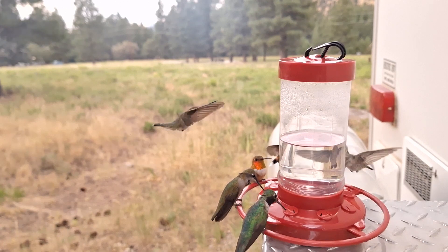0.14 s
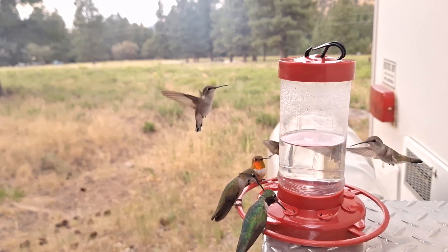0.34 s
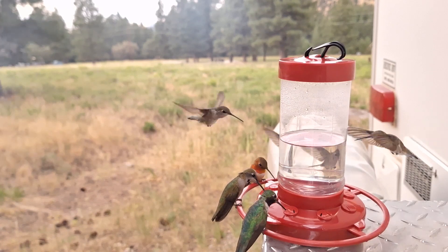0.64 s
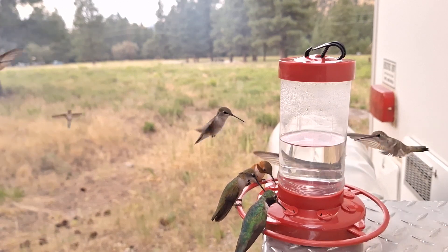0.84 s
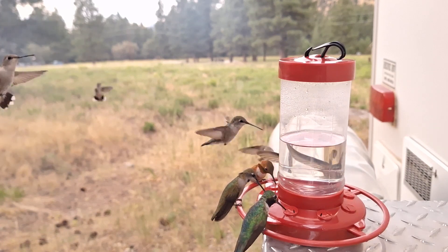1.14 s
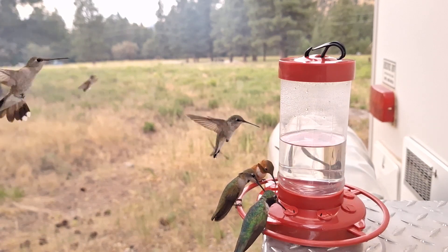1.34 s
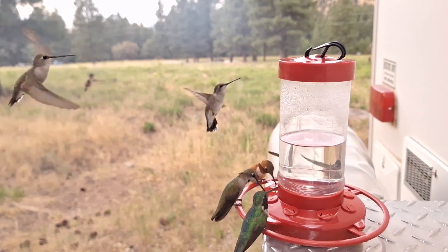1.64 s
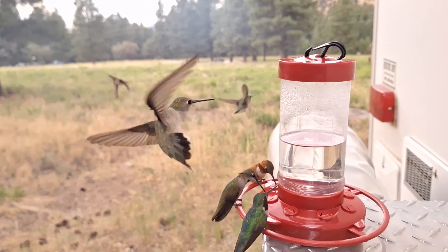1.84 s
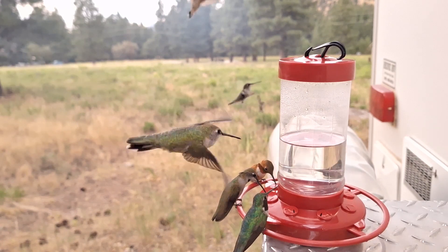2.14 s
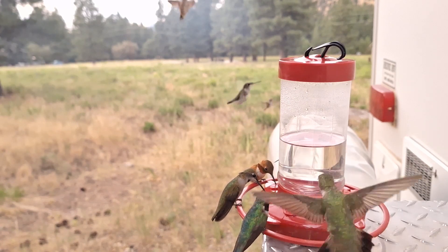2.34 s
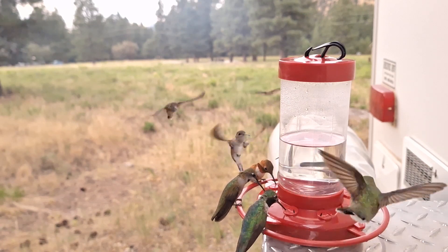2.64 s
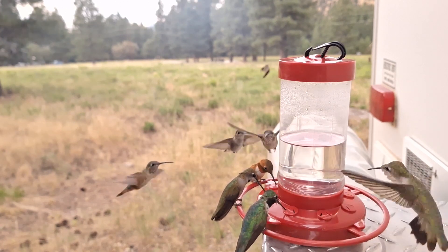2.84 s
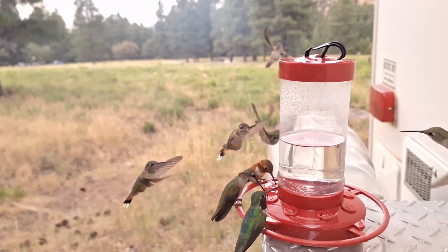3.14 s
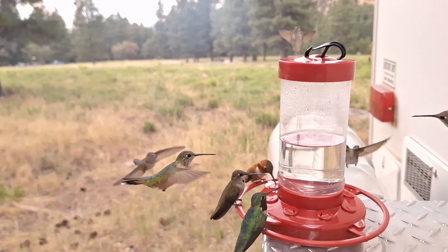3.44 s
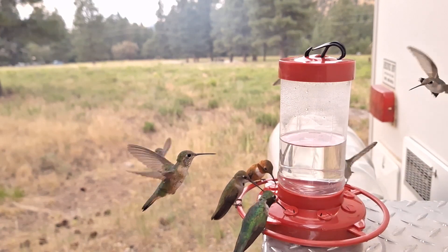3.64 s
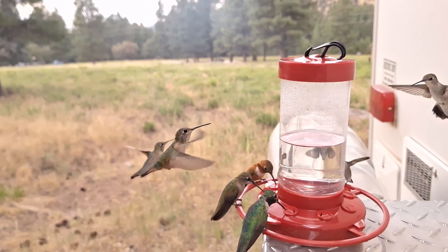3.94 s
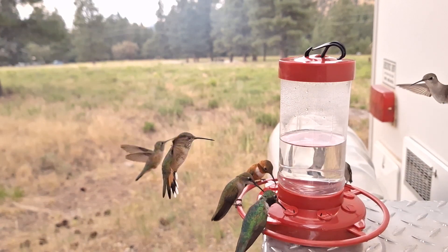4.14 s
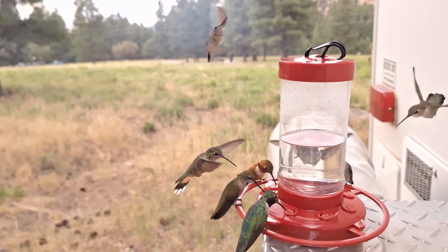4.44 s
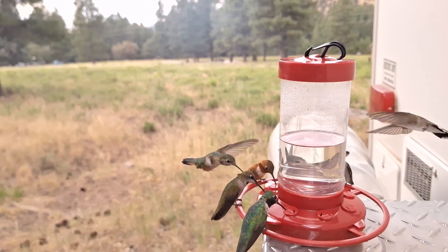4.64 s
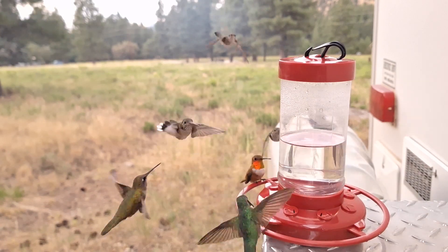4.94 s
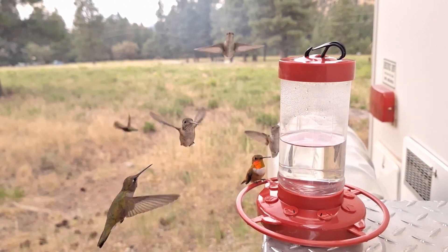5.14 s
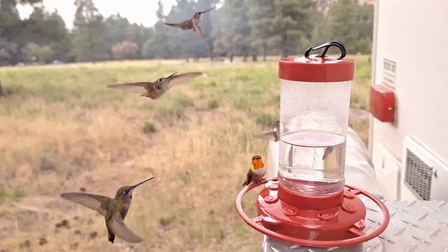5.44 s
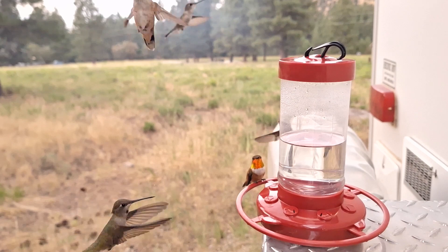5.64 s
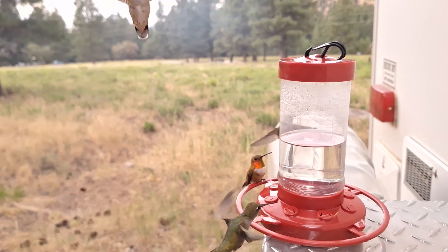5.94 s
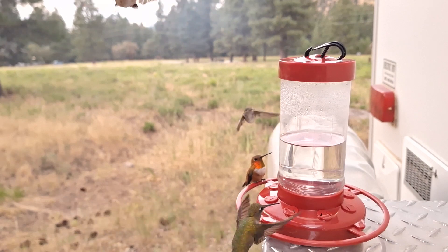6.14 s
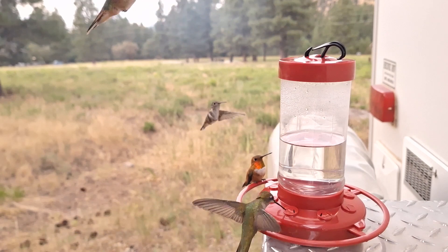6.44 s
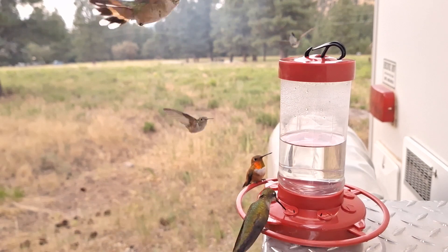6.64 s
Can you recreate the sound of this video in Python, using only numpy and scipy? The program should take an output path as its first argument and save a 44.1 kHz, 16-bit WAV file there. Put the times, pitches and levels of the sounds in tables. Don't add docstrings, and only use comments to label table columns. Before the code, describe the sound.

Deep fluttering wing hums swell and fade around a feeder amid tiny chips and buzzy notes, then wings clap and a shrill feather whistle bursts past.

```python
import sys
import numpy as np
from scipy import signal
from scipy.fft import rfft, irfft
from scipy.io import wavfile
from scipy.ndimage import uniform_filter1d

SR = 44100
rng = np.random.default_rng(int(sys.argv[2]) if len(sys.argv) > 2 else 0)


def generate_wav(sig):
    pcm = np.round(np.clip(np.atleast_2d(sig).T, -1, 1) * 32767).astype(np.int16)
    wavfile.write(sys.argv[1], SR, pcm)


def how_loud(loudness_db):
    steps = np.asarray(loudness_db, float) / 20
    return 10 ** steps


N = 298998
USUAL_DB = -50


def evened(x):
    return x / np.sqrt(np.mean(x ** 2) + 1e-20)


def read(points, hz):
    f, value = np.transpose(points)
    return np.interp(np.log(hz + 1), np.log(f + 1), value)


def curves(rows):
    s, *columns = np.transpose(rows)
    return [np.interp(np.arange(N) / SR, s, c) for c in columns]


def drift(hz):
    steps = rng.standard_normal(N // 64 + 2)
    slow = signal.sosfiltfilt(signal.butter(2, hz, fs=SR / 64, output="sos"), steps)
    return evened(np.interp(np.arange(N) / 64, np.arange(len(slow)), slow))


def band(x, lo_hz, hi_hz):
    return signal.sosfilt(signal.butter(2, [lo_hz, min(hi_hz, SR / 2.1)], "band", fs=SR, output="sos"), x)


def sided(x, pan_db):
    return np.array([x * how_loud(pan_db / 2), x * how_loud(-pan_db / 2)])


def add(mix, s, sound):
    part = mix[:, round(s * SR):][:, :sound.shape[1]]
    part += sound[:, :part.shape[1]]


def visits(rows):
    edge_db, away_db = 4.5, 39
    s, stay, hz, db = np.transpose(rows)[:, :, None]
    t = np.arange(0, N + 256, 256) / SR
    gone_db = edge_db * (2 * (t - s) / stay) ** 2
    power = how_loud(2 * (db - np.minimum(gone_db, away_db)))
    pull = how_loud(db - np.minimum(gone_db, 200)) + 1e-30
    rate = (pull * hz).sum(0) / pull.sum(0)
    return curves(np.transpose([t, rate, 10 * np.log10(power.sum(0))]))


def wings(hz, db, orders, wobble, waver_db, pan_db):
    beats = np.cumsum(hz * (1 + wobble * drift(11.9))) / SR
    hum = 0
    for k in range(1, 11):
        tone = np.sqrt(2) * np.cos(2 * np.pi * (k * beats + rng.random()))
        hum = hum + tone * how_loud(db + read(orders, k) + waver_db * min(k - 1, 3) * drift(8.7))
    return sided(hum, pan_db + 1.3 * drift(9.1)), beats


def near_birds():
    # middle in seconds, stay in seconds, strokes (twice the beat) in Hz, hum in dB.
    slow_visits = [(.45, 0.59, 83.2, -45), (1.05, 0.12, 89.65, -49), (1.38, 0.19, 78.53, -44.5),
                   (1.82, 0.29, 90.23, -37), (2.35, 0.5, 87.82, -38.5), (3.16, 0.32, 86, -44),
                   (3.61, 0.13, 93.57, -34.5), (4.06, 0.14, 78.7, -43.5), (4.36, 0.19, 80.77, -39),
                   (4.85, 0.29, 83.94, -34), (5.27, 0.1449, 91.32, -37.5), (5.57, 0.23, 81.5, -43.5),
                   (5.95, 0.38, 72.1, -44.5), (6.32, .2, 85.1, -37), (6.55, .3, 74.4, -43.5)]
    # middle in seconds, stay in seconds, strokes (twice the beat) in Hz, hum in dB.
    fast_visits = [(.25, 0.45, 101.8, -43.5), (.75, 0.21, 91.73, -38.5), (1.17, 0.15, 100.1, -38.5),
                   (1.94, 0.15, 106.3, -43), (2.26, 0.13, 106.9, -45), (2.71, 0.21, 94.76, -39),
                   (3.16, .2, 102.7, -38), (3.33, 0.14, 86.55, -42), (3.55, .3, 101.2, -38.5),
                   (3.8, 0.19, 86.5, -44), (4.06, 0.16, 90.1, -41.5), (4.51, 0.15, 94.9, -37),
                   (4.82, 0.1501, 102.7, -41.5), (5.12, 0.12, 88.4, -40.5), (5.5, 0.39, 88.16, -38.5),
                   (5.87, 0.29, 87.53, -39), (6.17, 0.24, 86.37, -41.5), (6.47, 0.22, 92.5, -40)]
    # middle in seconds, stay in seconds, beat in Hz, hum in dB.
    side_visits = [(.45, 0.61, 64.06, -52), (1.1, 0.84, 52.6, -53.5), (1.85, .4, 48.05, -43.5),
                   (2.26, .2, 46.48, -37.5), (2.71, 0.2, 46.42, -36), (3.12, 0.33, 58.73, -42.5),
                   (3.6, 0.49, 60.92, -51.5), (4.7, 0.68, 60.2, -47.5), (5.4, .5, 54.07, -48.5),
                   (5.85, 0.31, 54.09, -44.5), (6.25, 0.32, 45.48, -40), (6.7, 0.43, 49, -49.5)]
    # order of the beat, level in dB.
    facing = [(1, -26.5), (2, -2.5), (3, -21), (4, -20.5), (5, -22.5), (6, -29.5), (8, -33.5), (12, -42.5)]
    # order of the beat, level in dB.
    sideways = [(1, -5), (2, -6), (3, -11), (4, -16.5), (6, -27), (12, -38.5)]
    (slow_hz, slow_db), (fast_hz, fast_db) = visits(slow_visits), visits(fast_visits)
    slow, slow_beats = wings(slow_hz / 2, slow_db, facing, wobble=0.01005, waver_db=1.3, pan_db=1.5)
    fast, fast_beats = wings(fast_hz / 2, fast_db, facing, wobble=0.01004, waver_db=-0.23, pan_db=2.5)
    side, _ = wings(*visits(side_visits), sideways, wobble=0.01496, waver_db=0.0, pan_db=6.0)
    near_db = np.maximum(slow_db, fast_db) - USUAL_DB - 8.0
    return slow + fast + side, (slow_beats, fast_beats), near_db


def trill():
    # time in seconds, level in dB.
    flight = [
        (5.17, -41),
        (5.22, -32),
        (5.46, -39),
        (5.64, -46.5),
        (5.74, -51),
        (5.86, -50.5),
        (6.12, -56),
        (6.27, -45.5),
        (6.66, -57.5),
    ]
    # time in seconds, peak in dB, left minus right in dB.
    downstrokes = [(5.1606, -55, 1.5), (5.1834, -32.5, -1), (5.2038, -23.5, 7), (5.2252, -27, 2),
                   (5.2492, -23.5, 8), (5.2728, -29.5, 2), (5.2967, -27, 11.5), (5.3204, -31, 9),
                   (5.343, -30, 7), (5.3689, -29, 9.5), (5.3898, -28, 13), (5.4138, -31, 8),
                   (5.4362, -31.5, 11.0), (5.4612, -32.5, 11.5), (5.4844, -36, 9.5), (5.5067, -40, 9.0),
                   (5.535, -33, 14), (5.5556, -34.5, 9), (5.577, -38, 12), (5.604, -45, 10),
                   (5.6258, -42, 10), (5.6453, -43, 3), (5.671, -43, 12), (5.6937, -35.5, 11),
                   (5.7169, -43, 6), (5.739, -42, 7), (5.764, -37, 12.0), (5.7845, -44, 4),
                   (5.8126, -49, 15), (5.8336, -45, 6), (5.8541, -42, 3.0), (5.876, -46.5, 7.5),
                   (5.8997, -45, 6.0), (5.9218, -48, 6), (5.9476, -48, 6.5), (5.967, -49, 8),
                   (5.99, -52, 8), (6.0375, -57, 11), (6.0564, -56.5, 5), (6.0793, -60, 11),
                   (6.1111, -59, 8), (6.1341, -55, 2.0), (6.1501, -57.5, 5.5), (6.1784, -53, 8),
                   (6.2017, -48, 8), (6.2215, -47, 6), (6.2439, -48, 3.0), (6.27, -46, 7),
                   (6.2935, -46, 6.5), (6.3162, -51, 2.0), (6.3387, -50, 3.0), (6.3696, -45, 5),
                   (6.3889, -49, 4), (6.409, -54, 1.5), (6.4404, -58, 2.5), (6.4664, -55, 2.0),
                   (6.489, -50, 2), (6.5384, -60, 8), (6.5641, -51, 0), (6.5868, -62, 5)]
    hz, last_beat_hz, end_s = 5765, 42.5, 6.697
    drop_db_per_side_db = 0.24
    t = np.arange(N) / SR
    db = curves(flight)[0]
    far_db = db.max() - db
    s, peak_db, side_db = np.transpose(downstrokes)
    count = np.append(0, np.cumsum(np.round(np.diff(s) * last_beat_hz)))
    beat_times = [s[0] - 1, *s, s[-1] + 1]
    beats = np.interp(t, beat_times, [-last_beat_hz, *count, count[-1] + last_beat_hz])
    edge = np.clip(np.minimum(t - s[0] + .012, end_s - t) / 0.004, 0, 1)
    place = (beats + .31) % 1 - .36
    hold = np.clip(.39 - far_db / 300, .3, 1)
    pulse = np.exp(-abs(place / np.where(place < 0, .07, hold)) ** 3)
    stroke_db = peak_db - drop_db_per_side_db * (side_db - 10) - 4
    stroke = how_loud(np.interp(np.floor(beats + .31), count, stroke_db)) * pulse
    stroke += how_loud(db - 15.5 + 0.4 * far_db)
    stroke *= how_loud(-6.0 * (t < s[2] - .002))
    pitch = hz + 400 * np.interp(place, [-.36, -.04, .2, .3, .45, .64], [.4, -.05, .1, .9, 1, .4])
    pitch += (50 + 2.5 * far_db) * np.tanh(drift(220)) + 25 * drift(15)
    turns = 2 * np.pi * np.cumsum(pitch) / SR
    shared_db = 1.26 * drift(260) - 5 * np.exp(-((place - .2) / .04) ** 2) - 2.1 * (place > .2)
    paths = [turns, turns + 1.784 + 0.58 * drift(39.95)]
    tone = np.array([(np.sin(p) + how_loud(-27.0) * np.sin(2 * p)) * how_loud(shared_db + 0.6 * drift(180)) for p in paths])
    rush = rng.standard_normal((2, N))
    tone += how_loud(-33) * evened(band(rush, hz, 1.31 * hz))
    blur = np.clip((far_db - 4) / 40, .08, .4)
    lo_hz, hi_hz = .96 * hz, 1.075 * hz
    tone += blur * evened(band(band(rush, lo_hz, hi_hz), lo_hz, hi_hz))
    return sided(stroke * edge, np.interp(t, s, side_db) - 3) * tone


def chip(db, second_db, length_ms, top_hz, drop_ms, knee_hz, slide, fade_db, pan_db):
    # frequency in Hz, gain in dB.
    beak = [(2600, -3.5), (3300, -6.5), (4200, 2), (6000, 1), (8000, 4), (10000, -2.5), (12500, -10),
            (16000, -13)]
    length_ms = 0.81 * length_ms
    ms = np.arange(0, length_ms, 1000 / SR)
    hz = knee_hz - slide * ms + (top_hz - knee_hz) * np.exp(-ms / drop_ms)
    turns = np.cumsum(hz) / SR
    catch_db = 2.3 * rng.standard_normal((4, 16))
    out = 0
    for k, order_db in ((1, 3.66), (2, second_db + 7.0), (3, second_db + .1), (4, second_db - 0.5)):
        db_k = order_db + read(beak, k * hz) + np.interp(ms, np.arange(16) * 2.51, catch_db[k - 1])
        out = out + how_loud(db_k) * np.sin(2 * np.pi * k * turns) * (k * hz < SR / 2)
    out = out + how_loud(-9) * evened(band(rng.standard_normal(2000), 4000, 14700))[:len(ms)]
    envelope = np.clip(ms / .9, 0, 1) * np.clip((length_ms - ms) / 7.0, 0, 1)
    return sided(how_loud(db + 5.0 - fade_db * ms / 24) * out * envelope, pan_db)


def chur(db, start_hz, bright_db, pan_db, second_db, third_db, length_ms, bend):
    # harmonic number, level in dB.
    chur_orders = [(1, -0.5), (2, -4.5), (3, 1.5), (4, -2), (5, -7.5), (6, -11), (8, -26)]
    u = np.linspace(0, 1, round(length_ms * SR / 1000))
    warble = np.interp(u, np.linspace(0, 1, 8), .012 * rng.standard_normal(8))
    turns = np.cumsum(start_hz * (1 - bend * u ** 1.675 + warble)) / SR
    rasp = how_loud(2.6 * rng.standard_normal((8, 12)))
    out = 0
    for k in range(1, 9):
        db_k = read(chur_orders, k) + bright_db * (k > 1) + second_db * (k == 2) + third_db * (k == 3)
        rough = np.interp(u, np.linspace(0, 1, 12), rasp[k - 1])
        out = out + how_loud(db_k) * rough * np.sin(2 * np.pi * k * turns)
    out = out + how_loud(bright_db - 5) * evened(band(rng.standard_normal(2000), 4700, 15000))[:len(u)]
    return sided(how_loud(db + 4.0 - 8.1 * u) * out * signal.windows.tukey(len(u), .4), pan_db)


def clap(db, low_db, pan_db):
    t = np.arange(500) / SR
    burst = rng.standard_normal((2, 500))
    crack = how_loud(db + 3.0) * evened(band(burst[0], 5800, 16000)) * np.exp(-t / 0.00081)
    thud = how_loud(low_db + 8.0) * evened(band(burst[1], 310, 1870)) * np.exp(-t / 0.0012)
    return sided(crack, pan_db + 9.5) + thud


def scuffle():
    size = round(.2 * SR)
    brush = evened(band(rng.standard_normal((2, N)), 553, 2894)) * how_loud(4.6 * drift(159))
    return how_loud(-62.5) * brush[:, :size] * np.hanning(size)


def peeps(length, beat_hz, hz, sag, db):
    t = np.arange(-.01, length + .01, 1 / SR)
    beat = np.round(t * beat_hz)
    loud, high, early = rng.standard_normal((40, 3))[beat.astype(int)].T
    arch_db = np.interp(t / length, [0, .2, 1], [-2, 0, -2])
    ms = 1000 * (t - beat / beat_hz)
    turns = np.cumsum(hz - sag * t - 30 * ms + 60 * high) / SR + early
    tone = np.sin(2 * np.pi * turns + np.array([[0], [1.2]]))
    peep = how_loud(4 * loud) * np.exp(-(ms / 2.2) ** 2) * tone * (beat >= 0) * (beat <= length * beat_hz)
    haze = evened(band(rng.standard_normal((2, len(t))), .9 * hz, 1.06 * hz)) * signal.windows.tukey(len(t), .3)
    return how_loud(db + arch_db) * (peep + how_loud(-14) * haze)


def air(spectrum, size, patchy_db):
    # frequency in Hz, correlation from -1 to 1.
    likeness = [(60, 0.78), (180, 0.91), (550, 0.51), (1650, -0.069), (4970, -0.06), (15000, 0.037)]
    frames, hz = 4 * N // size + 5, np.fft.rfftfreq(size, 1 / SR)
    a, b, c, d, patches = rng.standard_normal((frames, len(hz), 5)).T
    patches = evened(uniform_filter1d(uniform_filter1d(patches, 8, 0), 6, 1))
    same = np.clip(read(likeness, hz), -1, 1)[:, None]
    left = a + 1j * b
    z = np.array([left, same * left + np.sqrt(1 - same ** 2) * (c + 1j * d)])
    z *= how_loud(read(spectrum, hz)[:, None] + patchy_db * patches)
    return evened(signal.istft(z, nperseg=size, noverlap=3 * size // 4)[1][:, :N])


def feather_hiss(beats, near_db, busy_db):
    # time in seconds, level in dB.
    rustle = [(0.0, -66), (1.04, -66.5), (1.47, -66.5), (1.74, -69), (1.85, -68), (3.59, -64), (3.76, -66),
              (6.38, -66), (6.78, -67)]
    # frequency in Hz, density in dB per Hz.
    hiss_spectrum = [(600, -68), (900, 0), (1300, -4), (2600, -6.5), (4000, -13), (6500, -4.5), (14000, -2),
                     (16200, 1)]
    puffs = sum(how_loud(4.0 * drift(15)) * np.cos(2 * np.pi * b) ** 16 for b in beats)
    hiss_db = curves(rustle)[0] + 3.5 + 0.29 * busy_db + 0.19 * near_db
    return how_loud(hiss_db) * air(hiss_spectrum, size=512, patchy_db=1.5) * evened(1 + 0.5 * puffs)


def distant_whistles():
    # middle in seconds, stay in seconds, throb in Hz, level in dB.
    whines = [(.16, 0.33, 47.4, -68), (.76, 0.25, 45.9, -73), (1.14, 0.25, 48.2, -67.5),
              (1.42, 0.093, 45.8, -70), (1.88, 0.25, 51.13, -65.5), (2.62, 0.31, 48.3, -70),
              (3.18, 0.26, 50.05, -69.5), (3.61, 0.14, 49.67, -71), (4.45, 0.46, 48.6, -75),
              (4.9, 0.19, 50.04, -68), (5.32, 0.4, 48.21, -74.5), (5.89, 0.24, 44.3, -70.5),
              (6.3, 0.45, 43.7, -75.5)]
    throb_hz, whine_db = visits(whines)
    throb = 1 + 0.43 * np.cos(2 * np.pi * np.cumsum(throb_hz) / SR)
    whine = evened(band(rng.standard_normal((2, N)), 3070, 5280)) * throb
    return how_loud(whine_db - 1.0) * whine


def flock_wash(busy_db):
    # frequency in Hz, density in dB per Hz.
    wash_spectrum = [(15, -10.5), (25, -2), (92, 1),  (125, -4.5), (206, -9.5), (706, -34), (1900, -50.5),
                     (3300, -120)]
    return how_loud(-44 + busy_db) * air(wash_spectrum, size=2048, patchy_db=3.5) * how_loud(0.46 * drift(26))


def flock():
    # time in seconds, level in dB.
    activity = [(0.0, -44), (0.91, -49.5), (0.96, -42), (1.02, -55), (1.11, -45), (1.55, -56.5),
                (1.87, -46.5), (2.55, -47.5), (2.79, -44), (2.87, -50), (3.12, -44.5), (4.06, -52.5),
                (4.7, -45.5), (4.83, -37.5), (4.97, -46.5), (5.67, -50.5), (6.25, -47.5), (6.78, -55.5)]
    busy_db = curves(activity)[0] - USUAL_DB
    hum, beats, near_db = near_birds()
    return hum + feather_hiss(beats, near_db, busy_db) + distant_whistles() + flock_wash(busy_db)


def nearby(x):
    t = np.arange(3000) / SR
    sparse = rng.standard_normal((2, 3000)) * (rng.random((2, 3000)) < .3)
    taps = sparse * how_loud(-60 * t / 0.12) * (t > .003)
    return signal.fftconvolve(x, taps / np.linalg.norm(taps[0]), axes=1)[:, :N]


def housing(sound, lag):
    taps = np.zeros((2, 90))
    taps[[0, 1], [5, 5 + lag]] = 1
    taps[1, 10 + rng.integers(2, 9)] = .2
    echo = rng.random((2, 4, 2))
    for port in range(2):
        taps[port, (10 + 79 * echo[port, :, 0]).astype(int)] += .9 * (echo[port, :, 1] - .5)
    return signal.fftconvolve(sound, taps / np.linalg.norm(taps, axis=1)[:, None], axes=1)


def scene():
    # start in seconds, level in dB, second harmonic in dB, length in ms.
    chip_calls = [(0.0177, -50, -3.5, 30), (0.139, -52.5, -15, 27), (0.7522, -54, 2.5, 37.3),
                  (1.662, -56, -0.5, 30.5), (1.8418, -56, -2, 37), (2.0446, -52, -0.5, 39.5),
                  (2.286, -51, 1, 34.0), (2.309, -46, -7, 27.8), (2.5467, -55, 2, 31),
                  (2.583, -56.5, -11, 28), (2.649, -48, -4, 34.0), (2.922, -48.5, -2.5, 51),
                  (3.021, -57.5, 1.5, 27.2), (3.2047, -47.5, -8.5, 30.2), (3.5072, -53, -5, 26.4),
                  (3.625, -54.5, -4.5, 33.8), (3.6532, -49, -17, 27.3), (3.977, -56.5, -6, 23.0),
                  (4.204, -59.5, -5.5, 37.8), (4.234, -46, -9, 32), (4.407, -54.5, 2, 21.7),
                  (5.199, -58, -5, 34.1), (6.6955, -44.5, -3.5, 33.7)]
    # top in Hz, drop time in ms, knee in Hz, slide in Hz per ms.
    chip_sweeps = [(7740, 4.8, 3750.0, 54), (7150, 4.0, 3400, 63), (8400, 4.5, 3450.0, 28),
                   (5350, 6.4, 3000.0, 9), (9500, 4.0, 3450.0, 34.0), (8250, 5.0, 3300.0, 10.4),
                   (7500, 2.7, 4650.0, 65), (6680, 4.7, 5000, 120), (5200.0, 6.6, 3150.0, 22.0),
                   (7800.0, 2.3, 3450.0, 34.0), (8700, 4.0, 3880, 43), (8700, 3.1, 4200.0, 52),
                   (7800, 4.0, 3900.0, 50), (5600.0, 6.0, 3450.0, 23.6), (5800.0, 6.6, 3150.0, 22.0),
                   (7800.0, 5.0, 3000.0, 10.6), (6200.0, 7.7, 3454, 35.2), (5800.0, 8.0, 3150.0, 22.0),
                   (7900, 4.4, 3330, 22.0), (9250, 3.0, 4350.0, 58.0), (5960, 6.0, 3330, 10.0),
                   (9540, 4.0, 3900.0, 53), (9100, 2.2, 4500.0, 62)]
    # fade in dB, left minus right in dB.
    chip_places = [(13.1, 0), (5, -3), (4.006, 2), (16.98, -1.5), (13, 0.5), (15.53, -1), (14, -1), (7, -3),
                   (13.86, -5), (8.01, 2), (5.5, -0.5), (21.8, 7.5), (10.1, -1.5), (14.5, 5), (7.04, 1.5),
                   (11, 1), (3.02, -5.5), (13.56, 1), (3.02, -2), (9.96, -0.5), (3.97, -1), (20.93, 8),
                   (11.1, 1)]
    # start in seconds, level in dB, start pitch in Hz, brightness in dB, left minus right in dB.
    chur_calls = [(0.026, -52, 1940, 4.5, -3), (0.123, -54.5, 1854, 2.5, 1), (0.607, -54.5, 1940, 6, -0.5),
                  (0.989, -52, 2100, -8, 5.5), (1.08, -54.5, 1894, -3, 2.5), (1.717, -60.5, 1828, 6.5, 2),
                  (1.816, -62.5, 1920, 7, -1), (2.215, -64.5, 1757, -4.5, -4),
                  (2.426, -55.5, 1968, 0, -2.5), (2.533, -54, 1941, 1.5, 1), (3.158, -51, 1930, -3.5, 1.5),
                  (5.849, -54.5, 2080, -5, 6), (5.928, -62.5, 1660, -2, 2), (5.962, -52, 2084, -10.5, 3.5),
                  (6.444, -64, 1697, 0, -6.5)]
    # second harmonic in dB, third harmonic in dB, length in ms, bend down from 0 to 1.
    chur_voices = [(4, 1, 19, 0.3), (6, 2, 23, 0.3), (-0.5, -7, 25, 0.28), (1, 4, 26, 0.29),
                   (6, 1.5, 24, .25), (5, -0.5, 20.6, 0.21), (-2, -1, 19, .2), (3, .1, 14.63, 0.24),
                   (-3, 2, 23.8, .2), (5, 0.5, 18.4, .2), (5, 1, 25, 0.24), (9, 8, 16.5, 0.27),
                   (2, -1, 18, .25), (18, -0.5, 16, 0.23), (-8, -1.5, 14.7, 0.1)]
    chip_lags = [0, 4, 3, 2, 6, 1, 0, -2, 2, -1, 4, 0, -1, 5, 6, 0, -2, 5, -2, 3, 3, 1, 6]
    chur_lags = [5, 5, 2, -5, 1, 2, 2, 1, 1, 5, 3, 4, 2, 0, 2]
    # start in seconds, peak in dB, low part in dB, left minus right in dB.
    wing_claps = [(0.1645, -48, -77, -14), (0.198, -40.5, -59, -9), (0.266, -47, -56.5, -10),
                  (3.491, -62, -84, -7), (4.309, -57, -80, 2), (4.3304, -51, -76, -4),
                  (4.787, -43.5, -65, -9), (4.793, -54, -61, -5), (4.816, -48.5, -51, 7),
                  (4.8371, -53, -43, -12), (4.8595, -51, -43.5, -6), (4.874, -41, -53, -18),
                  (4.8606, -36.5, -54, -18), (4.9122, -37.5, -59, -21), (4.9146, -52, -48, -8),
                  (4.849, -56, -63, -6), (4.867, -58, -59, -6), (4.883, -59, -60, -6),
                  (4.896, -56, -64, -6)]
    # first peep in seconds, length in seconds, beat in Hz, whistle in Hz, sag in Hz per second.
    faint_trills = [
        (4.992, .4, 49.8, 3900, 500),
        (.249, .1, 51.5, 2230, 0),
        (1.163, .1, 46, 2200, 0),
        (2.437, .07, 49.5, 3650, 900),
        (1.705, .08, 66, 3700, 900),
        (5.493, .04, 38, 3600, 3000),
        (.074, .02, 60, 2150, 6000),
    ]
    faint_levels = [-59, -58.5, -60, -61, -62, -65, -57]
    calls = np.zeros((2, N))
    chips = np.column_stack([chip_calls, chip_sweeps, chip_places])
    churs = np.column_stack([chur_calls, chur_voices])
    clap_lags = [2] * len(wing_claps)
    for voice, rows, lags in ((chip, chips, chip_lags), (chur, churs, chur_lags), (clap, wing_claps, clap_lags)):
        for (s, *row), lag in zip(rows, lags):
            add(calls, s, housing(voice(*row), lag))
    add(calls, 4.77, scuffle())
    for (s, *row), db in zip(faint_trills, faint_levels):
        add(calls, s - .01, peeps(*row, db))
    loud = trill()
    return calls + loud + nearby(how_loud(-12.5) * calls + how_loud(-18) * loud) + flock()


def roll_off(x):
    return signal.sosfilt(signal.butter(12, 16720, fs=SR, output="sos"), x)


def record(dry):
    # frequency in Hz, left minus right in dB.
    ports = [(60, -0.5), (500, -0.5), (2000, 3.5), (5000, 2), (7500, 5.5), (10000, -8), (15000, -1)]
    hz = np.fft.rfftfreq(N, 1 / SR)
    tilt_db = read(ports, hz)
    bass = 1 / np.sqrt(1 + (42 / (hz + 1)) ** 16)
    treble = 1 / (1 + (hz / 15950) ** 400)
    balance = how_loud(np.array([tilt_db / 2, -tilt_db / 2]))
    return roll_off(irfft(rfft(dry) * bass * treble * balance, N))


dry = scene()
out = record(dry)
generate_wav(out)
```